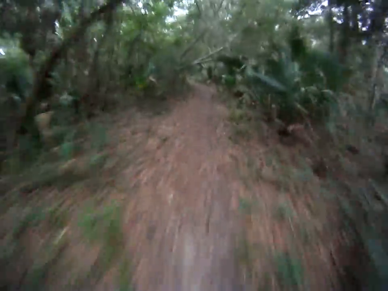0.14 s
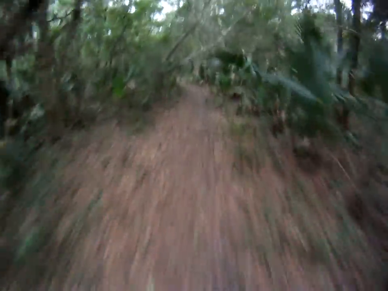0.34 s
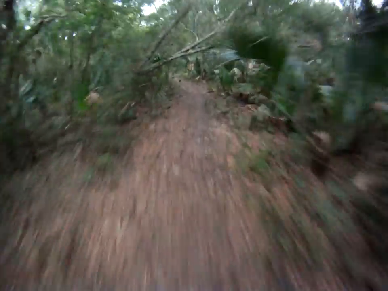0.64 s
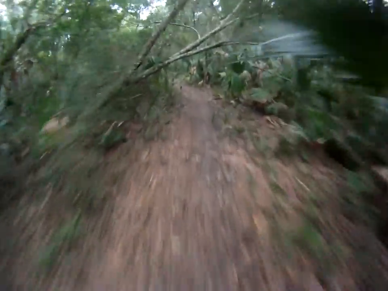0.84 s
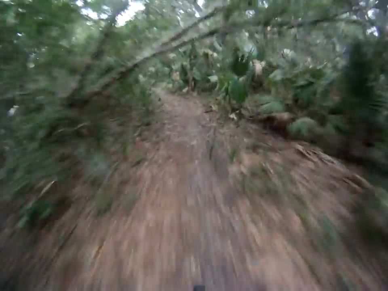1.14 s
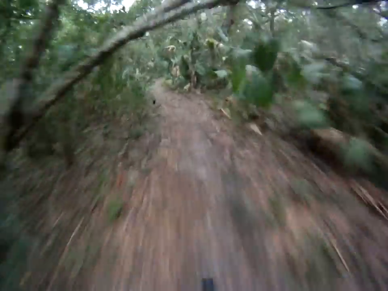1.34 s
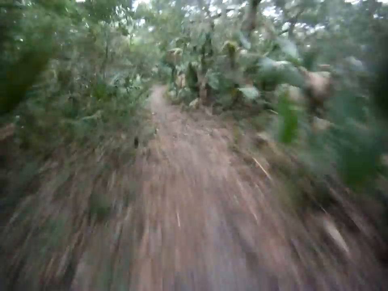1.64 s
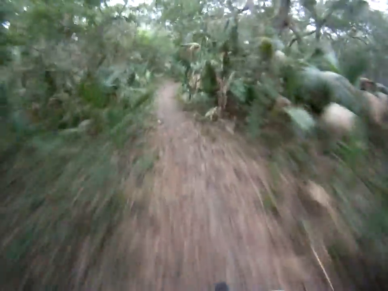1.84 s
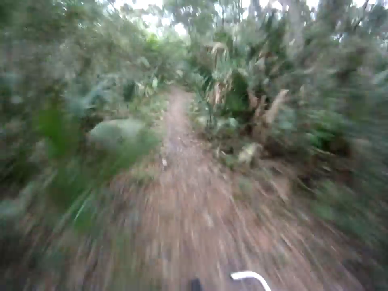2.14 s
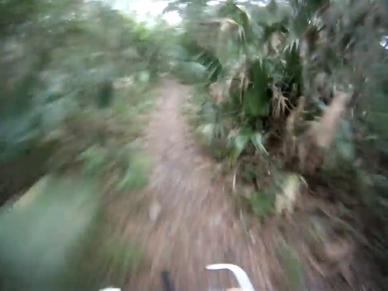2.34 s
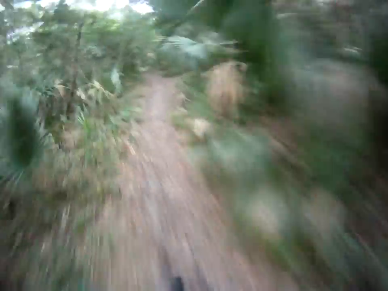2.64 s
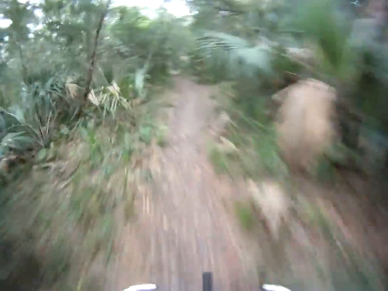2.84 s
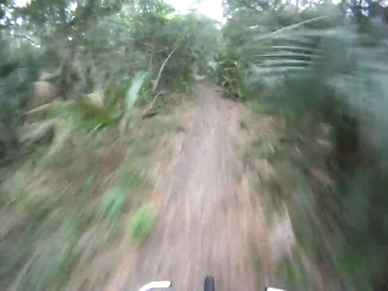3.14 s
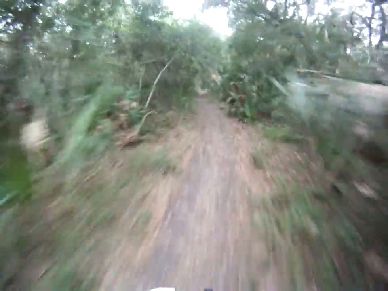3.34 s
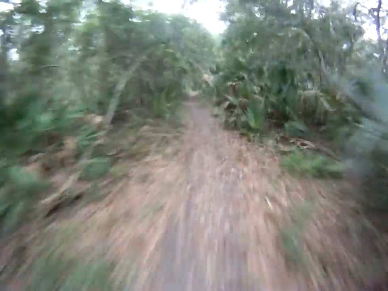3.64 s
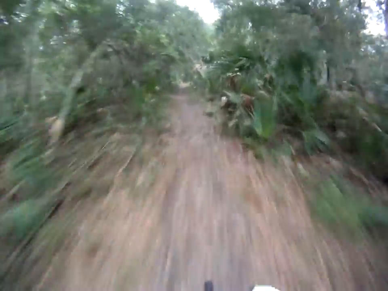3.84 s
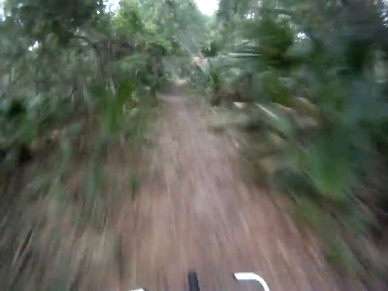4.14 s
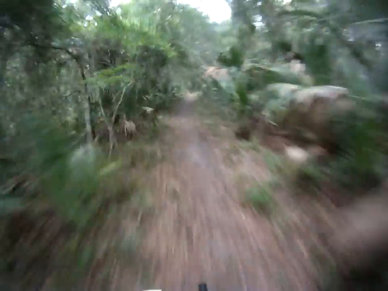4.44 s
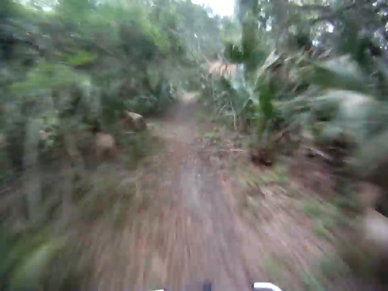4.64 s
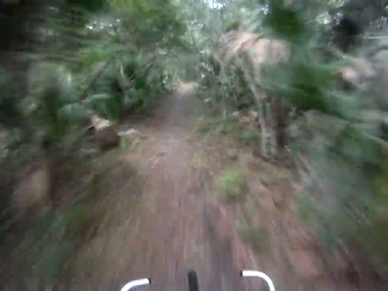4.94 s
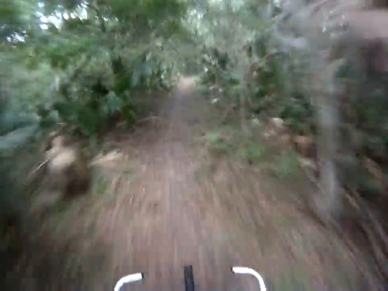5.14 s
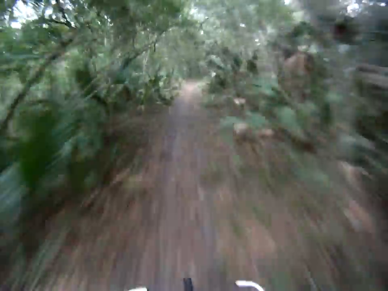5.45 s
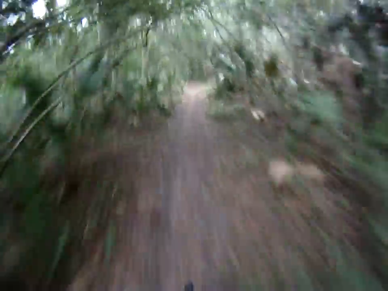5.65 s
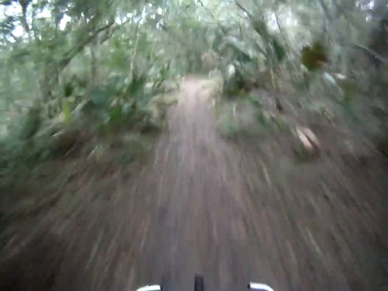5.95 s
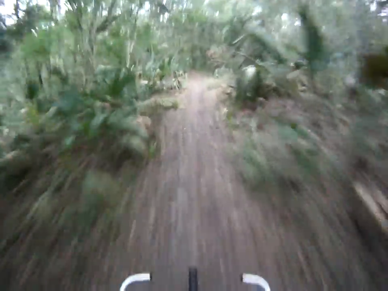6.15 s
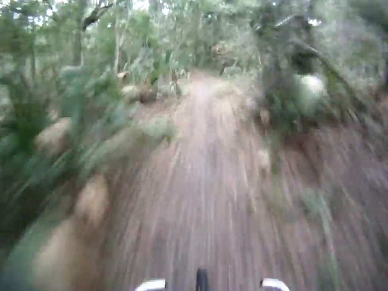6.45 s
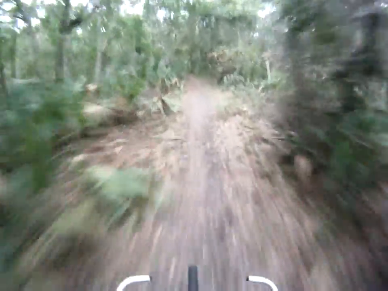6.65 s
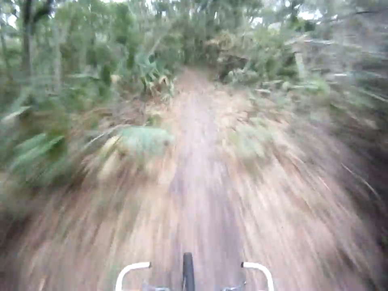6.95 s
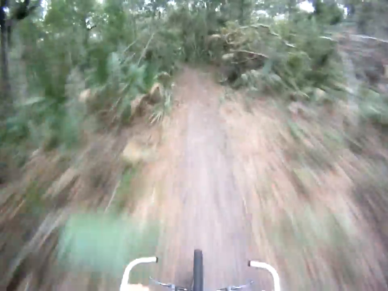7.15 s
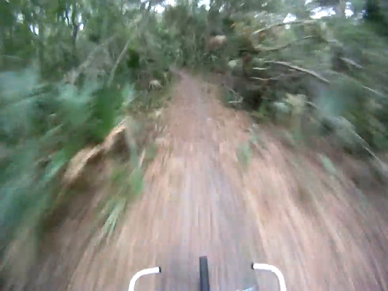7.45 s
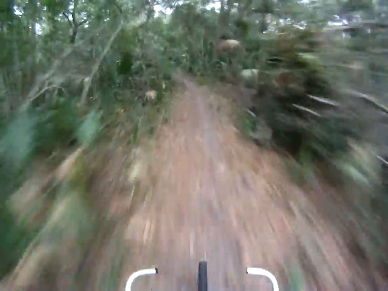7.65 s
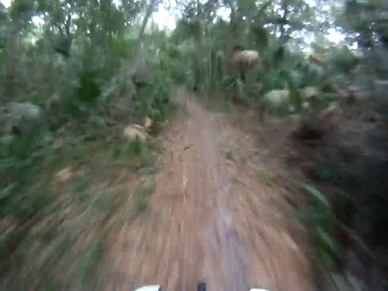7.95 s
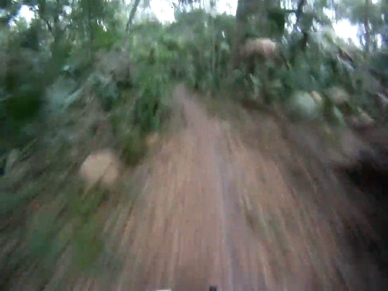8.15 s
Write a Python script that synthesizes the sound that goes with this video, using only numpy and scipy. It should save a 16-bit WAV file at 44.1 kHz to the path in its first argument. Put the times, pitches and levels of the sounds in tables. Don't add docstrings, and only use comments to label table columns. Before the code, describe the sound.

Outdoors on a woodland dirt trail, a bicycle speeds along, heard through a small camera shut in a plastic case on the rider. Tyres hiss and crunch over grit and dry leaves while low wind lumps thud. A loose mount ticks and chatters. Near three seconds a faint whistle leads to a loud twig slap; afterwards rolling grows stronger and rattles come more often.

```python
import sys
import numpy as np
from scipy import signal
from scipy.io import wavfile
from scipy.ndimage import uniform_filter1d

SR = 44100
rng = np.random.default_rng(int(sys.argv[2]) if len(sys.argv) > 2 else 0)


def field_ratio(decibels):
    return 10 ** (np.asarray(decibels, dtype=float) / 20)


def to_wav(s):
    ch = np.atleast_2d(s).T
    pcm = np.round(np.clip(ch, -1, 1) * 32767)
    wavfile.write(sys.argv[1], SR, pcm.astype(np.int16))


N = 366471

# f/Hz, level/dB per Hz
CRUNCH_SPECTRUM = [(150, -20), (250, -14.5), (490, -13), (593, -7), (750, -6.5), (1110, 0), (1570, -2.5),
                   (1800, -2), (1940, -2), (2130, 0.5), (3200, -17), (4160, -42.5), (7040, -120)]
# f/Hz, width/Hz, level/dB
CASE_RESONANCES = [(578, 100, 5), (1120, 120, -0.5), (1428, 80, 3.5), (1776, 95, 4), (2210, 430, 3.5),
                   (3390, 190, 17), (4700, 430, 3.5)]


def evened(x):
    return x / np.sqrt(np.mean(x ** 2) + 1e-20)


def curves(rows):
    s, *columns = np.transpose(rows)
    return [np.interp(np.arange(N) / SR, s, column) for column in columns]


def coloured(x, points, peaks=()):
    size = 8192
    hz = abs(np.fft.fftfreq(size, 1 / SR))
    f, level = np.transpose(points)
    db = np.interp(np.log(hz + 1), np.log(f + 1), level)
    for mid, width, lift in peaks:
        db = db + lift / (1 + (2 * (hz - mid) / width) ** 2)
    log_gain = np.log(field_ratio(np.maximum(db, -100)))
    spectrum = np.exp(np.conj(signal.hilbert(log_gain)))
    taps = np.fft.ifft(spectrum).real[:size // 2]
    return evened(signal.oaconvolve(x, taps)[:N])


def drift(seconds):
    span = int(seconds * SR)
    once = uniform_filter1d(rng.standard_normal(N), span)
    return evened(uniform_filter1d(once, span))


def ring(modes):
    t = np.arange(4000) / SR
    sound = np.zeros(len(t))
    for k, (hz, db, t60) in enumerate(modes):
        sound += (-1) ** k * field_ratio(db - 60 * t / t60) * np.sin(2 * np.pi * hz * t)
    return sound / abs(sound).max()


def add(mix, s, sound):
    at = round(s * SR)
    sound = sound[max(-at, 0):]
    part = mix[max(at, 0):][:len(sound)]
    part += sound[:len(part)]


def gusts():
    # t/s, half length/s, buffet level/dB, flutter level/dB
    gust_rows = [(0.015, 0.04, -16, -40), (0.122, 0.034, -31, -43), (0.312, 0.066, -17, -46),
                 (.39, 0.1, -34, -32), (0.707, 0.15, -29.5, -44), (1.076, 0.034, -24, -47),
                 (1.551, 0.033, -20, -49), (1.7, 0.1, -33, -62), (1.86, 0.087, -31, -38),
                 (2.003, 0.027, -41, -41), (2.39, 0.053, -30, -41.5), (2.57, 0.13, -44, -40),
                 (3.19, 0.17, -41.5, -46), (3.603, 0.25, -36.5, -45), (3.27, 0.047, -53, -40),
                 (3.995, 0.056, -28, -40.5), (4.26, 0.11, -30.5, -39), (4.525, 0.075, -29, -56),
                 (4.695, 0.087, -37, -44), (4.91, 0.19, -34, -46), (5.11, 0.13, -27, -47),
                 (5.29, 0.049, -30, -26), (5.707, 0.32, -30, -42.5), (6.057, 0.12, -32, -44),
                 (6.373, .12, -26, -44.5), (6.74, 0.23, -34, -43), (7.18, 0.14, -44, -40),
                 (7.447, 0.093, -34.5, -40.5), (7.648, 0.063, -25, -40), (7.917, 0.14, -35, -40),
                 (8.2, 0.36, -55, -47)]
    calm_db, cap_db = (-42.5, -48.5), (-33, -39)
    sway_db, edge_db = 2, 13
    t = np.arange(0, N + 64, 64) / SR
    s, half, *peak_db = np.transpose(gust_rows)[:, :, None]
    out = []
    for db, calm, cap in zip(peak_db, calm_db, cap_db):
        gust_gain = field_ratio(db - edge_db * ((t - s) / half) ** 2)
        power = field_ratio(calm) ** 2 + (gust_gain ** 2).sum(0)
        capped_db = np.minimum(10 * np.log10(power), cap)
        out.append(np.interp(np.arange(N) / SR, t, capped_db) + sway_db * drift(0.022))
    return out


def eddies(points, per_s, seconds):
    bursts = rng.standard_normal(N) * (rng.random(N) < per_s / SR)
    lumps = coloured(bursts, points)
    power = uniform_filter1d(lumps ** 2, int(seconds * SR))
    return evened(lumps / (power + 0.055) ** 0.47)


def wind():
    # f/Hz, level/dB per Hz
    buffet_spectrum = [(8, -20), (20, 4), (40, -8.5), (55, -10.5), (80, -40.5), (200, -61), (900, -92)]
    # f/Hz, level/dB per Hz
    flutter_spectrum = [(30, -28), (55, -4.5), (75, -4), (105, -4), (130, -15.5), (160, -25.5), (220, -35),
                        (400, -46), (1200, -83)]
    buffet_db, flutter_db = gusts()
    buffet = field_ratio(buffet_db) * eddies(buffet_spectrum, 60, 0.065)
    flutter = field_ratio(flutter_db) * eddies(flutter_spectrum, 110, 0.073)
    return buffet + flutter


def tyres():
    # t/s, ground pressure level/dB, dry leaves under the tread level/dB
    roll = [(0.0, -48.5, 6.5), (0.53, -49.5, 5.5), (0.99, -47.5, 2), (1.53, -50, 5), (1.78, -49, 3),
            (2.01, -46, 2.7), (2.45, -42, -1.5), (2.73, -43, -4), (3.15, -48, 1.5), (3.84, -49, 2.5),
            (4.37, -44, -2), (4.88, -44, -.9), (5.14, -44.5, 0), (5.48, -43, -1.5), (6.3, -42, -2.5),
            (6.55, -42.5, -1.2), (7.71, -40.5, -2.4), (8.31, -37.5, -2.5)]
    # f/Hz, level/dB per Hz
    fizz_spectrum = [(2300, -33.5), (2900, -8), (3200, -26.5), (3600, 4.5), (4300, -6), (4800, -1),
                     (5250, 0), (5600, -5.5), (6000, -5), (7000, -68)]
    # f/Hz, level/dB per Hz
    hum_spectrum = [(60, -28), (140, 2), (200, 2.5), (350, -1), (480, -5.5), (700, -23)]
    grit_per_s, grit_spread_db, grit_db = 1500, 3, -9.5
    crunch_db, leaves_db = curves(roll)
    press_db = crunch_db + 43
    fizz_db = -60 + press_db + leaves_db
    hum_db = -57 + 0.28 * press_db

    grain_size = field_ratio(grit_spread_db * np.minimum(rng.exponential(1, N), 3))
    grit = grain_size * (rng.random(N) < grit_per_s / SR)
    grit = evened(grit * np.sign(rng.standard_normal(N)))
    drive = rng.standard_normal(N) + field_ratio(grit_db) * grit
    drive = evened(drive * field_ratio(0.83 * drift(0.093) + 0.26 * drift(0.032)))

    hum = coloured(rng.standard_normal(N) * field_ratio(0.48 * drift(0.0075)), hum_spectrum)
    crunch = coloured(drive, CRUNCH_SPECTRUM, CASE_RESONANCES)
    fizz = coloured(drive, fizz_spectrum, CASE_RESONANCES)
    return field_ratio(crunch_db + 0.13) * crunch + field_ratio(fizz_db) * fizz + field_ratio(hum_db) * hum


def jolts():
    # t/s, direction +-1, peak level/dB, f/Hz, swings
    swing_rows = [(-.006, 1, -19, 45, 1.0), (.012, 1, -15.5, 25, 1.05), (.392, -1, -21, 85, 1.5),
                  (1.672, 1, -25, 36, 1.0), (1.845, 1, -23, 29, 1.3), (2.564, 1, -14.5, 92, 2.3),
                  (2.784, -1, -21, 85, 1.3), (4.487, 1, -23, 28, 1.0), (5.268, 1, -16, 24, 1.0),
                  (7.838, 1, -22, 34, 1.0), (7.918, -1, -21, 52, 1.1), (7.982, 1, -15.5, 25, 1.05)]
    # t/s, level/dB
    scrapes = [
        (.002, -47),
        (1.272, -43.5),
        (2.553, -31),
        (7.971, -35),
    ]
    out = np.zeros(N)
    rasp = coloured(rng.standard_normal(N), CRUNCH_SPECTRUM, CASE_RESONANCES)
    for s, way, db, hz, swings in swing_rows:
        t = np.arange(0, swings / hz, 1 / SR)
        envelope = np.sin(np.pi * (t / t[-1]) ** 0.7) ** 0.6
        add(out, s, way * field_ratio(db) * np.sin(2 * np.pi * hz * t) * envelope)
    for s, db in scrapes:
        add(out, s, field_ratio(db) * rasp[round(s * SR):][:800] * np.hanning(800))
    return out


def contacts():
    # t/s, level/dB
    ticks = [(.1517, -46), (.1866, -52), (.3008, -63), (.3332, -58), (.919, -42.5), (1.0651, -53),
             (1.4697, -49), (1.532, -35), (2.069, -46), (2.1531, -52), (2.4539, -55), (2.5557, -55),
             (2.5766, -41.5), (2.7283, -59), (3.2351, -58), (3.548, -45), (3.6176, -37), (3.6382, -44),
             (3.6567, -52), (3.8857, -43), (3.98, -55), (4.5646, -53), (4.7612, -55), (4.9113, -54),
             (5.1328, -58), (6.1864, -41.5), (6.3341, -43), (6.9487, -54), (7.3887, -47), (8.173, -41.5)]
    # t/s, level/dB, gap/ms, rebound minus first/dB
    rebounds = [(0.372, -50.5, 7.4, 9), (.6894, -54, 5.4, 4), (1.8976, -49, 6.5, -9), (2.31, -40, 7.2, -10),
                (2.377, -41, 5.1, -6), (2.421, -49, 4.6, 6), (3.322, -60, 11, 1), (3.3504, -50.5, 6, -11),
                (3.92, -51, 12.5, -12), (4.045, -51, 14, -9), (4.2366, -35, 7.5, -6.5),
                (4.343, -40.5, 8.5, -12), (4.388, -38, 4.3, -8), (4.6437, -38.5, 11, -5),
                (4.842, -40, 7.7, -10), (4.923, -35, 10.3, -16), (4.9515, -42, 5.5, -15),
                (5.2613, -35, 8, -1.5), (5.635, -36.5, 12.7, -2), (5.816, -39.5, 6.1, -6),
                (6.097, -34, 8.1, -2), (6.35, -35.5, 11, -9), (6.612, -48, 10, -3), (7.9683, -36.5, 7.6, 0),
                (8.106, -51, 6.6, 8), (8.137, -50.5, 9.9, 5.5)]
    # t/s, level/dB, first gap/ms, loss per bounce/dB
    rattles = [(.008, -33.5, 5.6, 3), (0.0906, -43.5, 5.5, 6), (0.582, -48, 8, 4), (.7518, -60, 5.9, 9),
               (1.9451, -37.5, 9.6, 8), (2.2698, -41, 9.1, 3), (3.5155, -60, 6.5, 0),
               (4.6065, -49, 5.9, 1.5), (5.199, -44, 9.2, 2), (5.5074, -38, 10.3, 4.2),
               (5.5551, -32, 5.6, 7), (5.6773, -36, 5.5, 3.5), (5.786, -36, 9.6, 5.5),
               (5.8218, -38.5, 6.2, 8), (6.2044, -43, 4.3, 8), (7.2796, -36.5, 8.6, 3.5),
               (7.7516, -38.5, 8, 4), (7.7934, -39.5, 8.5, 1.5), (7.8903, -34.5, 5.1, 2.5)]
    bounces, settled_gap_ms = 4, 5.5
    tremble_per_s, tremble_db = 3, -63
    touches = list(ticks)
    for s, db, ms, change in rebounds:
        touches += [(s, db), (s + ms / 1000, db + change)]
    unevenness = rng.uniform(0.34, 1.25, (len(rattles), bounces))
    for (s, db, ms, loss), uneven in zip(rattles, unevenness):
        gaps_ms = np.r_[0, ms, settled_gap_ms * uneven[2:]]
        levels_db = db - loss * np.arange(bounces) ** 1.43
        touches += list(zip(s + np.cumsum(gaps_ms) / 1000, levels_db))
    when, size = rng.random((100, 2)).T
    moments = np.cumsum(-np.log(1 - when) / tremble_per_s)
    touches += [(s, tremble_db + 4 * z) for s, z in zip(moments, size) if s < N / SR]
    return touches


def mount():
    # f/Hz, level/dB per Hz
    mount_spectrum = [(500, -23), (1200, -10), (2100, -3.5), (2800, -14.5), (3250, -8.5), (3600, -3.5),
                      (4200, -9.5), (4450, -11), (4800, -9), (5300, -14.5), (6000, -19), (7000, -37)]
    # f/Hz, width/Hz, level/dB
    mount_resonances = [(3450, 180, 5), (2880, 130, 5), (4840, 300, 3), (5600, 300, 4)]
    slip_ms, slip_at_db, slip_doubles_db = 3, -35, 14.5
    force = np.zeros((2, N))
    first = np.zeros(N)
    t = np.arange(1500) / SR
    touches = contacts()
    for (s, db), place in zip(touches, rng.random(len(touches))):
        ms = min(slip_ms * 2 ** ((slip_at_db - db) / slip_doubles_db), 12.0)
        ms = max(ms, 1)
        slip = field_ratio(db - 9.4 * t / (ms / 1000)) * np.minimum(t / 0.0012, 1)
        add(force[0], s, slip * np.sqrt(place))
        add(force[1], s, slip * np.sqrt(1 - place))
        add(first, s + 0.001, field_ratio([db + 11]) * 3 / ms)
    blows = force * rng.standard_normal((2, N))
    blows[1] += first
    scale = np.sqrt(np.mean(blows ** 2, axis=1))
    resonant = scale[0] * coloured(blows[0], mount_spectrum, mount_resonances)
    dull = scale[1] * coloured(blows[1], mount_spectrum)
    return field_ratio(4.0) * (resonant + dull)


def pebbles():
    # t/s, peak level/dB, f/Hz, t60/s
    strikes = [
        (.1535, -33, 2200, .01),
        (.3006, -33, 5650, .016),
        (1.277, -33, 2400, .009),
        (5.768, -43, 5600, .01),
        (7.9695, -28, 1300, .008),
    ]
    out = np.zeros(N)
    for s, db, hz, t60 in strikes:
        add(out, s, field_ratio(db) * ring([(hz * 0.794, 0, t60), (hz * 1.05, -1, t60)]))
    return out


def whistle():
    # t/s, f/Hz, level/dB
    whistles = [
        [(2.57, 2090, -53), (2.62, 2190, -56), (2.66, 2180, -52), (2.70, 2170, -58)],
        [(2.69, 1820, -52), (2.71, 1820, -50), (2.74, 1790, -56), (2.77, 1780, -47), (2.82, 1750, -50),
         (2.86, 1760, -49), (2.90, 1715, -47.5), (2.94, 1665, -52), (3.0, 1610, -60)],
    ]
    out, t = np.zeros(N), np.arange(N) / SR
    for rows in whistles:
        hz, db = curves(rows)
        gate = np.clip(np.minimum(t - rows[0][0], rows[-1][0] - t) / 0.014, 0, 1)
        tone = np.sin(2 * np.pi * np.cumsum(hz + 18 * drift(0.0064)) / SR)
        out += np.sqrt(2) * field_ratio(db + 3.0 * drift(0.01)) * gate * tone
    return out


def twig():
    # t/s, peak level/dB
    slaps = [
        (2.7835, 12),
        (2.7846, -16),
        (2.7855, 10),
        (2.7868, 3),
        (2.7881, 8),
        (2.7895, -12.5),
        (2.7906, -12),
    ]
    # f/Hz, level/dB, t60/s
    shell_modes = [(136, -20, 0.11), (316, -17.5, 0.035), (400, -24, 0.036), (690, -15, 0.02),
                   (1094, -9.5, 0.017), (1770, -2, 0.022), (2146, -1, 0.013), (2722, 1, 0.013),
                   (3070, -2.5, 0.0045), (3620, -3.5, 0.013), (4230, -4, 0.013), (4850, -7, 0.0047),
                   (5620, -13.5, 0.0031)]
    out = np.zeros(N)
    for s, db in slaps:
        add(out, s, field_ratio(db) * ring(shell_modes))
    return out


def scene():
    return (wind() + tyres() + mount() + jolts() + twig() + pebbles() + whistle())[None]


def top_cut(x):
    return signal.sosfilt(signal.butter(12, 16140, fs=SR, output="sos"), x)


def record(dry):
    peak_db = 20 * np.log10(abs(dry[0]) + 1e-9)
    fall_db = np.arange(N) * 340.0 / SR
    envelope_db = np.maximum.accumulate(peak_db + fall_db) - fall_db
    over_db = np.clip(envelope_db + 6.5, 0, 12)
    late_db = uniform_filter1d(np.pad(over_db, (330, 0))[:N], 200)
    slow = signal.resample_poly(dry[0] / field_ratio(late_db), 40, 147)
    held = np.repeat(np.clip(slow, -0.97, 0.97), 4)
    back = signal.resample_poly(held, 147, 160)[:N]
    back = np.pad(back, (0, N - len(back)))
    low_pass = signal.firwin(401, 15250, window=("kaiser", 2), fs=SR)
    edged = signal.oaconvolve(back, low_pass, "same")
    finished = np.clip(edged, -1, 1)[None]
    return top_cut(finished)


dry = scene()
out = record(dry)
to_wav(out)
```